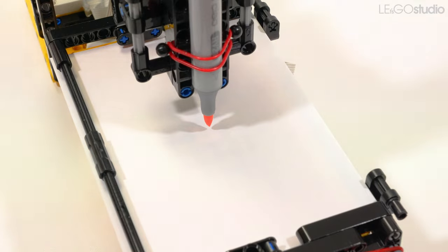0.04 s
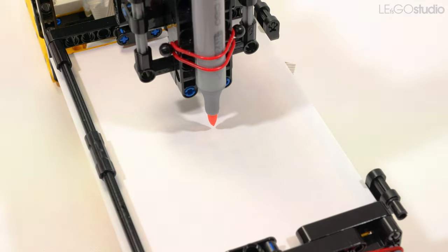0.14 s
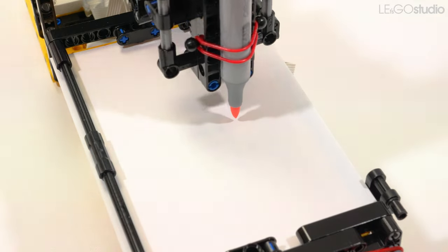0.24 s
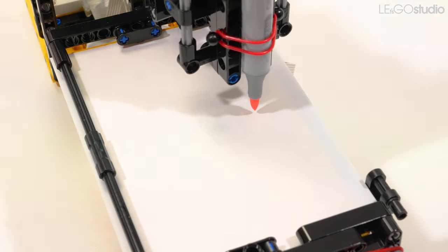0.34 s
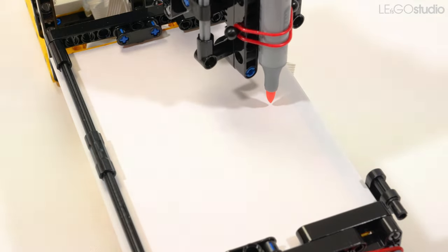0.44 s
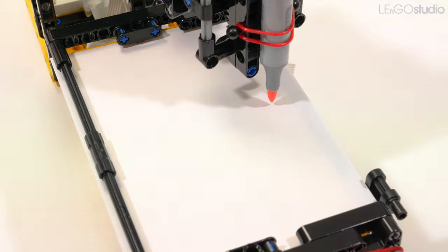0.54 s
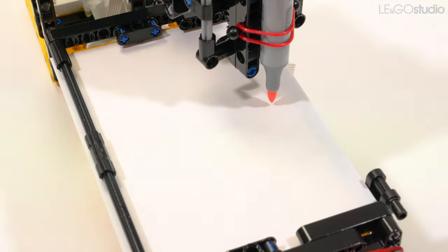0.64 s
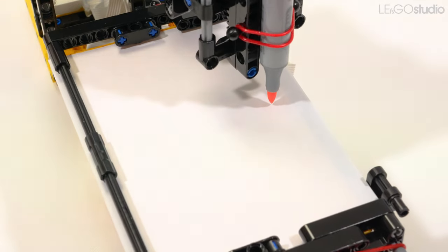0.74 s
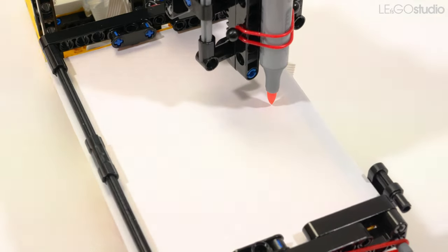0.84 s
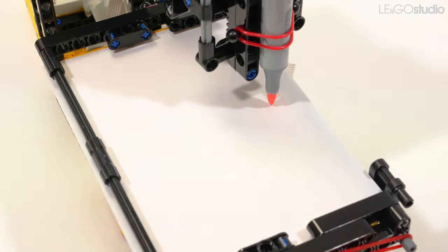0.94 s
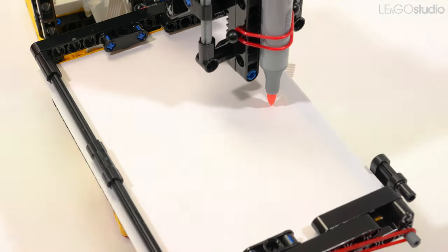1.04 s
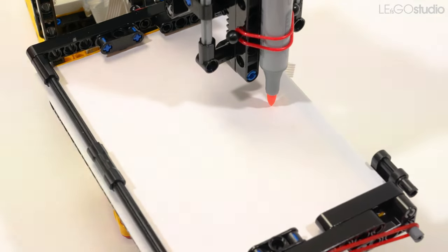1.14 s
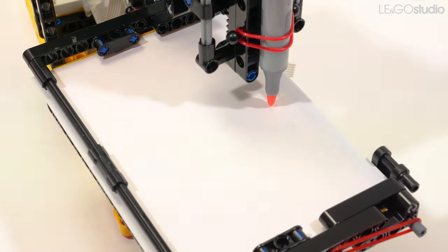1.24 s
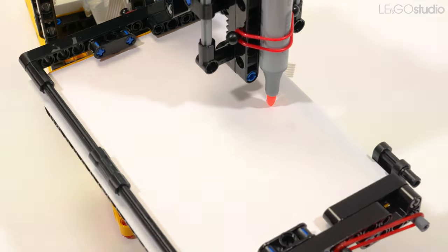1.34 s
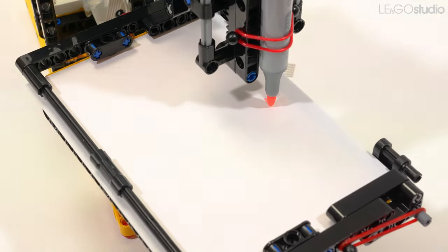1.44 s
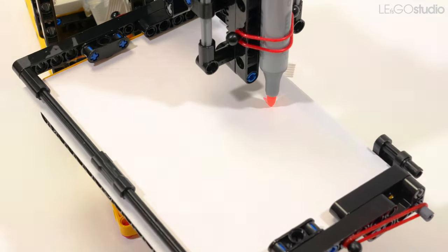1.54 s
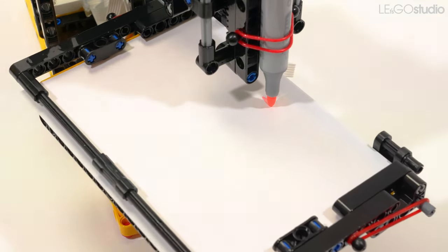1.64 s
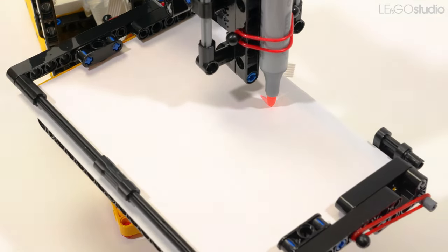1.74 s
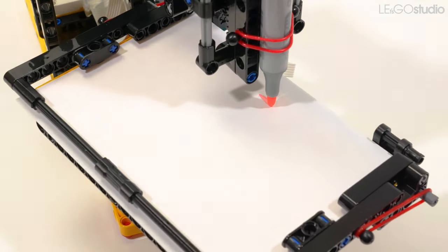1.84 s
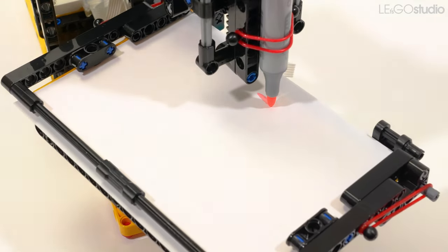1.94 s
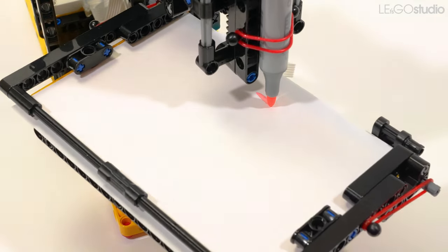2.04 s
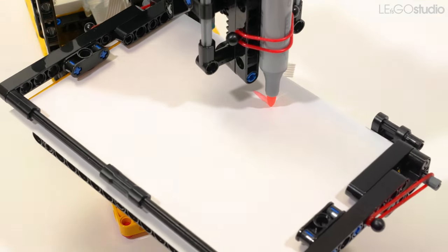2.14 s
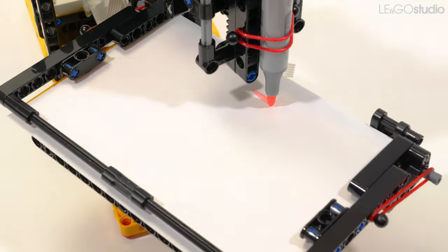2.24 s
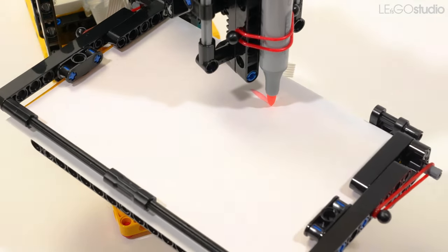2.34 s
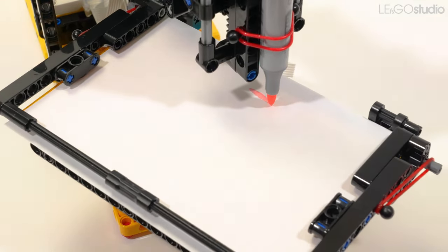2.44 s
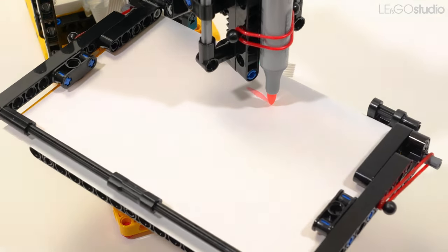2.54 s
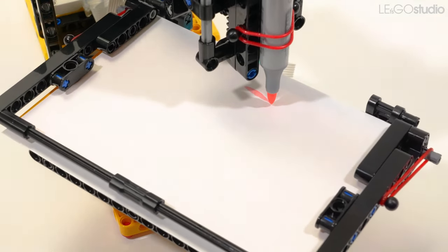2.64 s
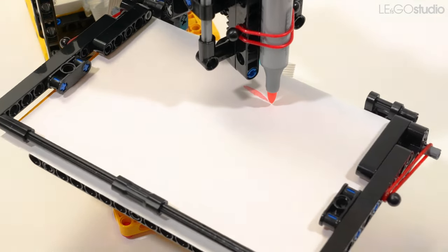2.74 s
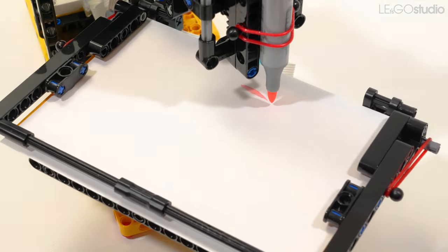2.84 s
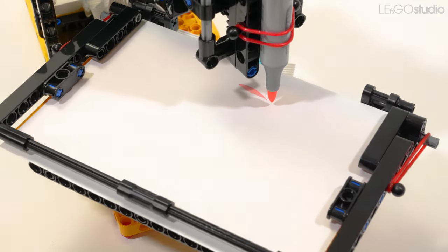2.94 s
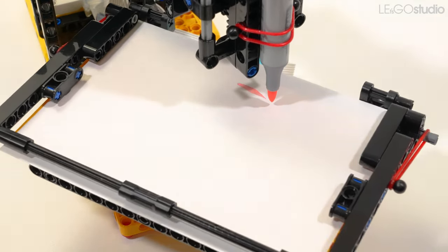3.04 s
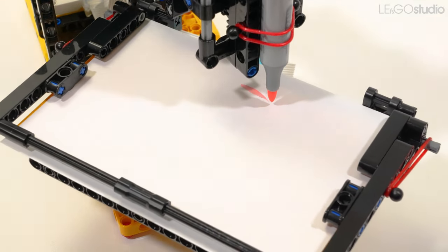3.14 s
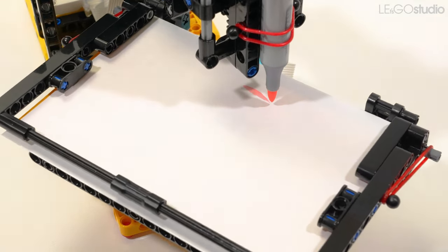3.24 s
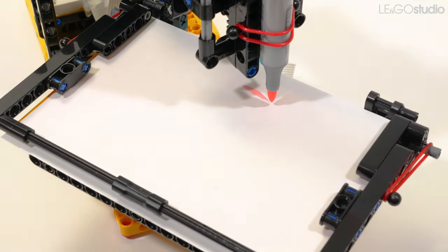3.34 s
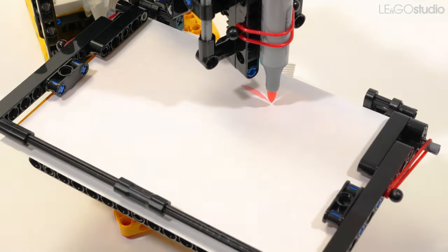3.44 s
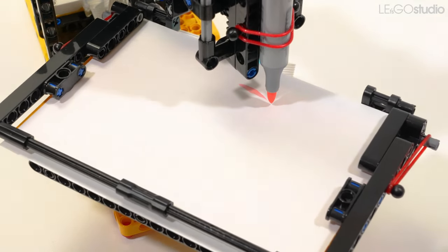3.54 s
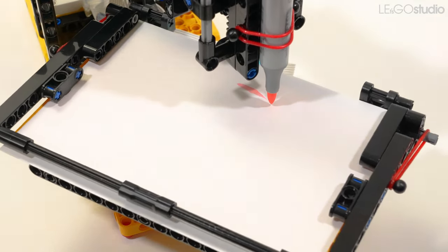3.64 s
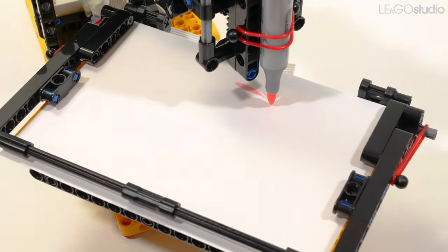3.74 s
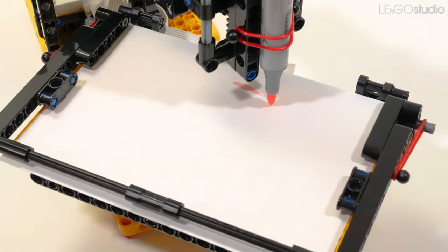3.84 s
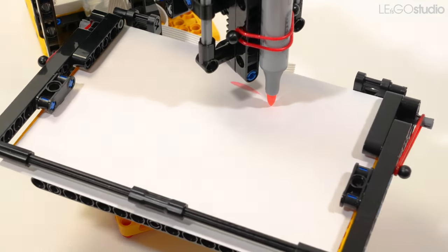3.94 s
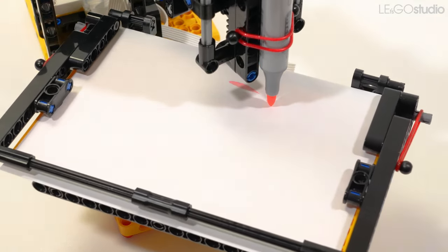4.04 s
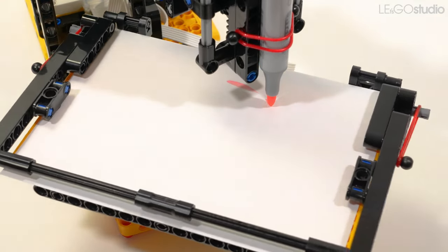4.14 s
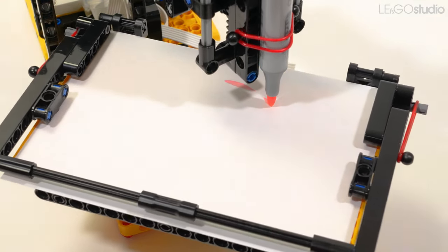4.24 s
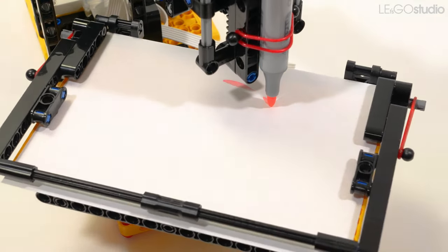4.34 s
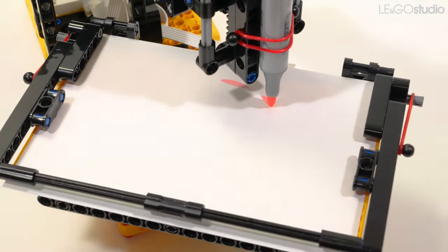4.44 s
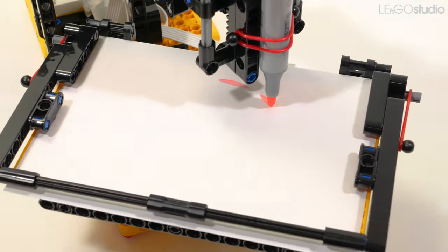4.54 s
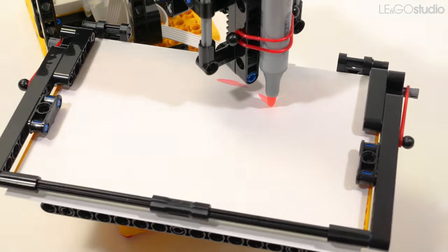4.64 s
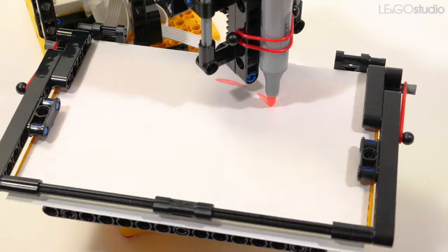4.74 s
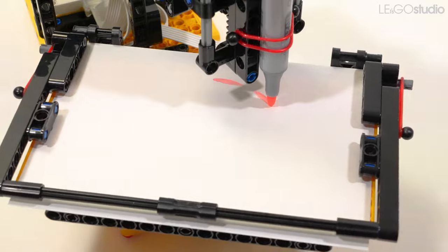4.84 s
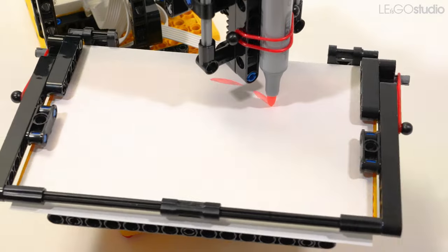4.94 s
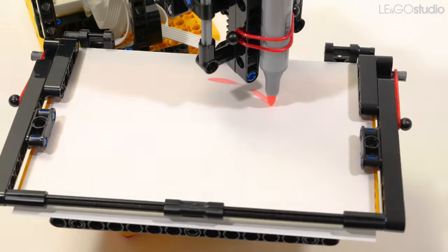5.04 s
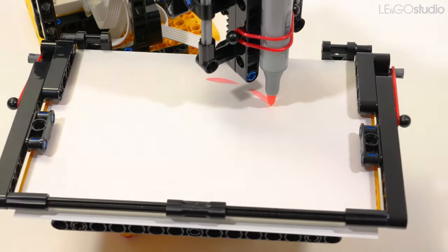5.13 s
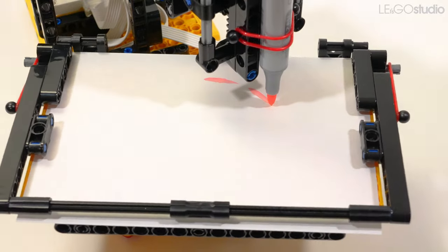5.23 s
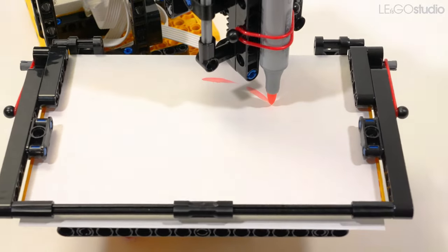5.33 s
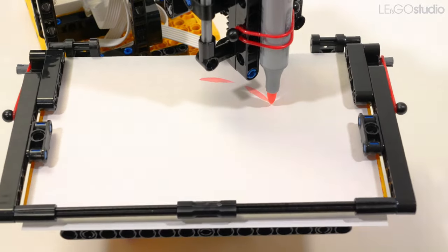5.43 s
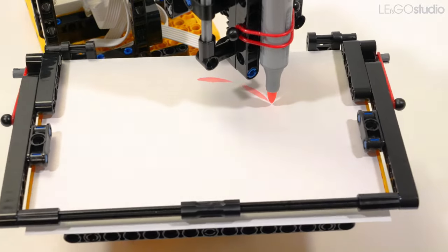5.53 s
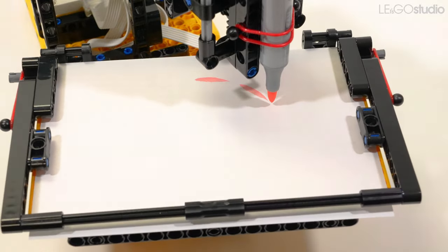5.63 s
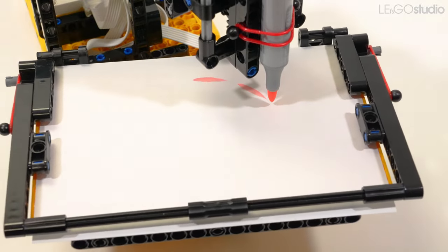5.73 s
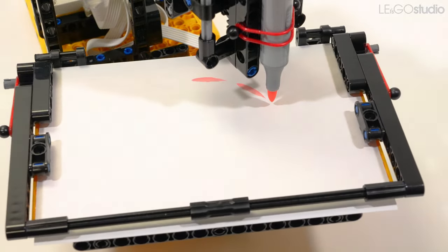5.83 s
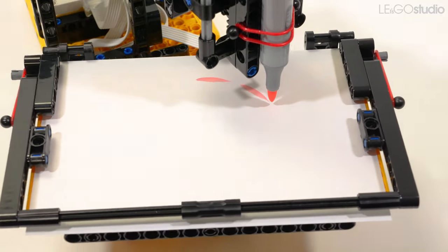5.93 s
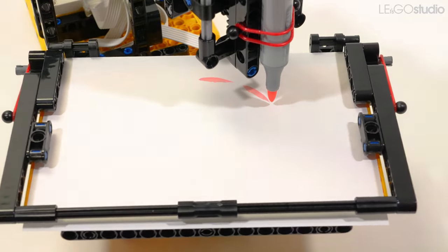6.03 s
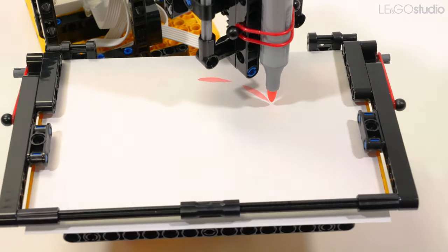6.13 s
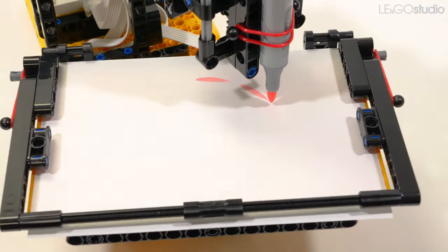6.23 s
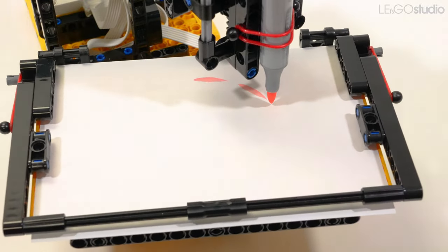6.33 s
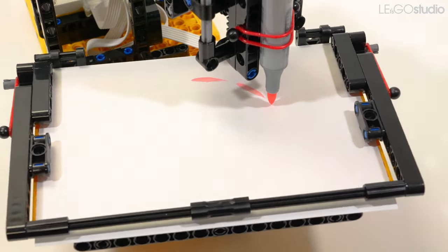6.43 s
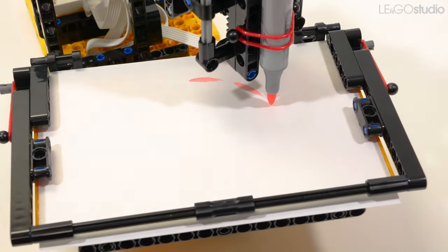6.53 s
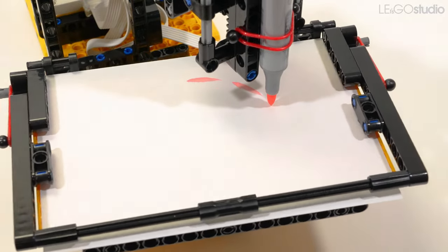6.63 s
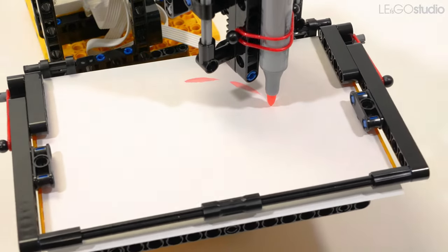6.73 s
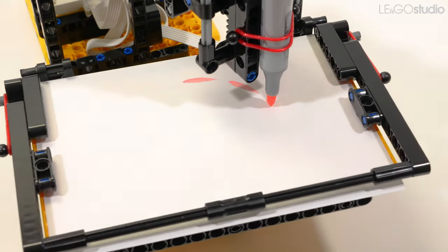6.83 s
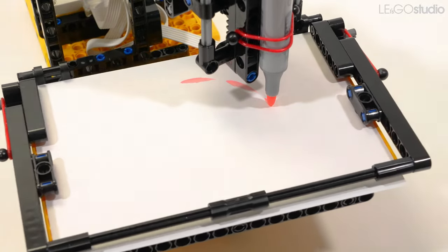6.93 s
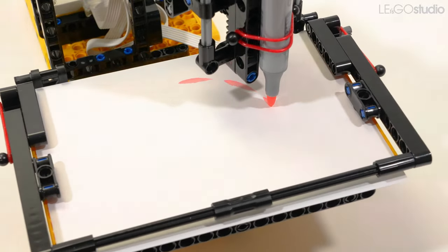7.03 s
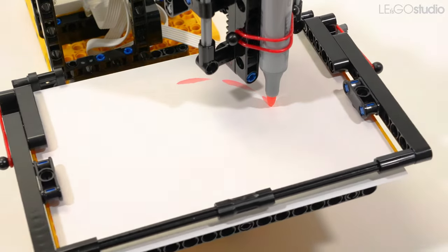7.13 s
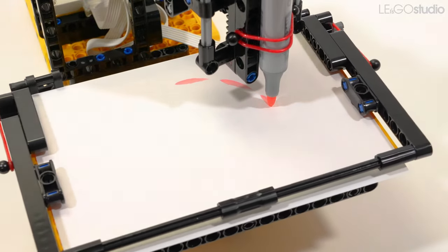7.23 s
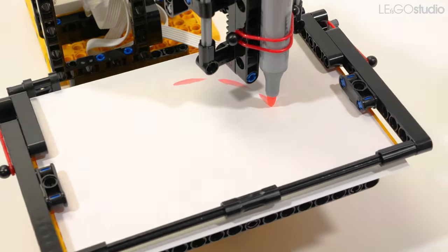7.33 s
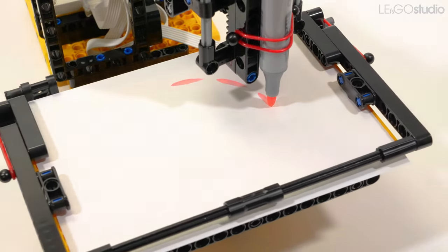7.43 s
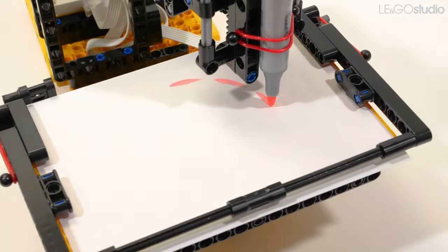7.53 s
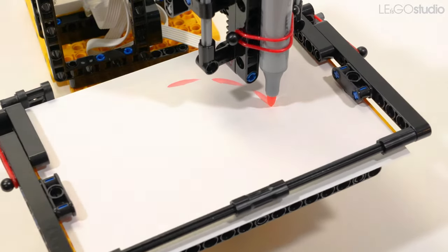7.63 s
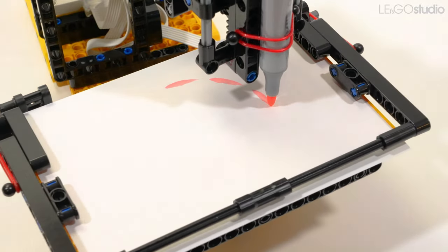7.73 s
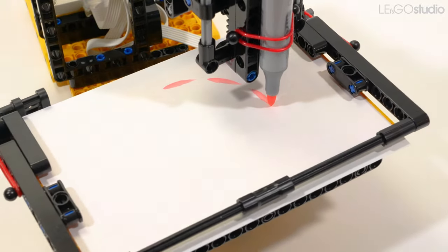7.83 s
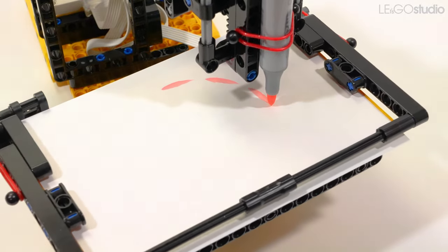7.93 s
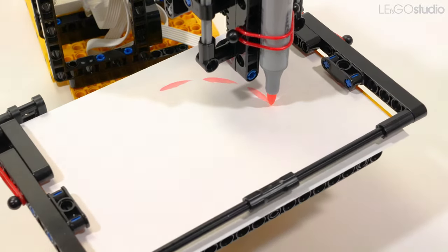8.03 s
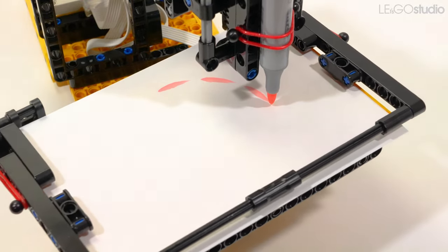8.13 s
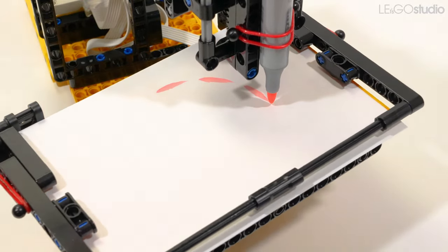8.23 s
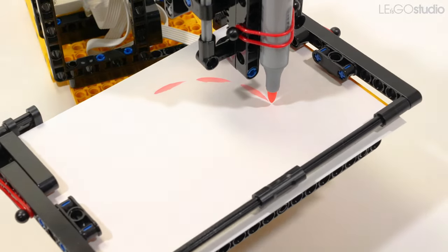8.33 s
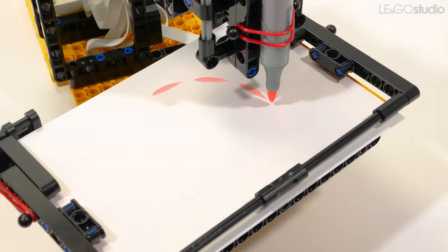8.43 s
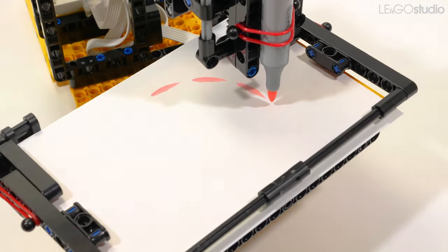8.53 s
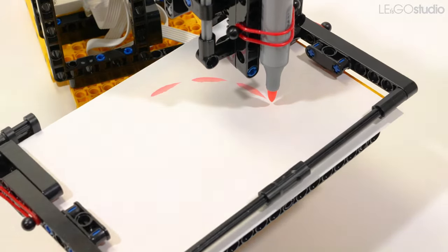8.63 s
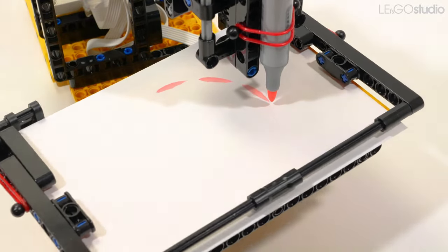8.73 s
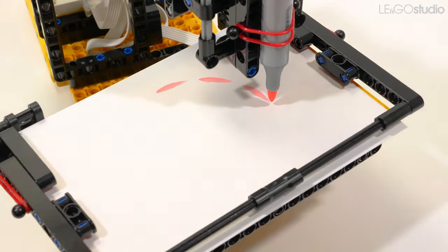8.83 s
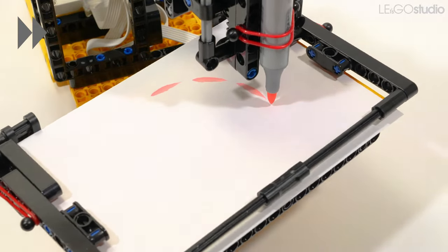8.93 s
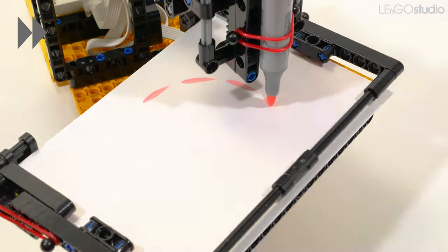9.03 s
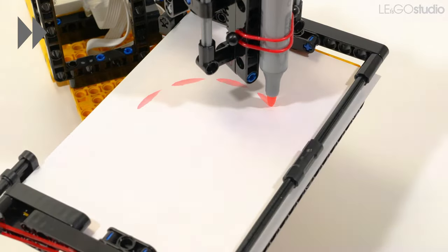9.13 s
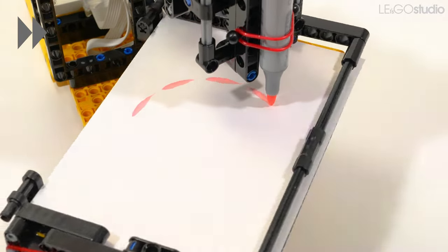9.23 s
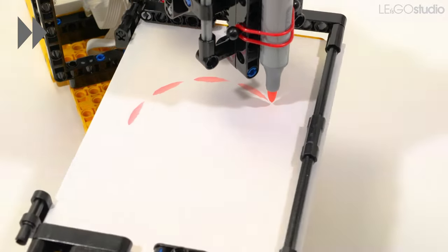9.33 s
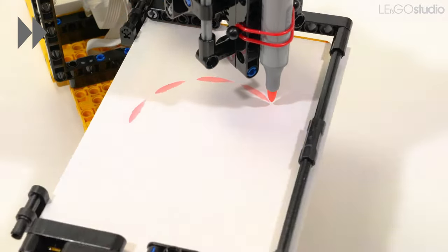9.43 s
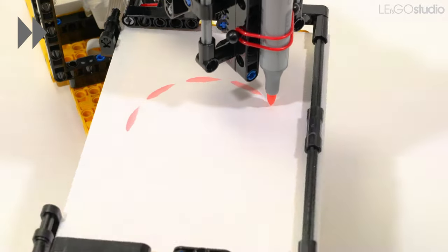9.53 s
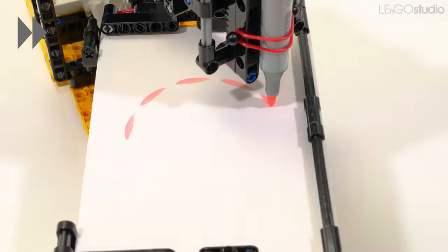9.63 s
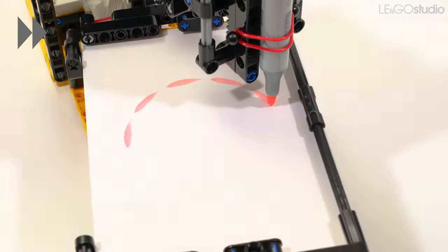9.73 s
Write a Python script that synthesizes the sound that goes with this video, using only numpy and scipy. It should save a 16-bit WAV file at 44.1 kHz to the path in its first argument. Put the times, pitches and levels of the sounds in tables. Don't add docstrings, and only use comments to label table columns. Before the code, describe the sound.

A toy plotter's small geared motor whirs back and forth in even strokes, hissing and whining, with plastic clicks between strokes over faint room ventilation.

```python
import sys
import numpy as np
from scipy import signal
from scipy.fft import rfft, irfft, next_fast_len
from scipy.io import wavfile
from scipy.ndimage import uniform_filter1d, map_coordinates

SR = 44100
rng = np.random.default_rng(int(sys.argv[2]) if len(sys.argv) > 2 else 0)


def level_to_linear(level):
    exponent = np.asarray(level, float) / 20
    return 10 ** exponent


def to_wav(sig):
    pcm = np.clip(np.atleast_2d(sig), -1, 1) * 32767
    pcm = np.round(pcm).astype(np.int16)
    wavfile.write(sys.argv[1], SR, pcm.T)


N = 430857
T = np.arange(N) / SR

# (start [s], length [s], hiss [dB], whine [dB])
OUT_STROKES = [
    (.555, 1.296, -35.5, -2),
    (3.33, 1.295, -35.5, -1),
    (6.085, 1.304, -36, -1),
    (8.85, 1.15, -35.5, -1),
]
BACK_STROKES = [
    (1.86, 1.317, -35.5, -3),
    (4.635, 1.297, -35, -3),
    (7.385, 1.313, -35.5, -2.5),
]
# (frequency [Hz], width [Hz], level [dB])
OUT_BODY = [(1530, 38, -3.5), (1840, 440, -3), (2800, 200, -6), (4070, 220, -5.5), (5030, 90, -11),
            (6050, 40, -9.5), (6460, 56, -5.5), (8100, 150, -2), (8770, 350, -0.5), (8840, 45, -2.5),
            (9260, 180, -6.5), (10370, 80, -4), (11420, 190, -22), (12720, 90, -8), (14700, 70, -2)]
BACK_BODY = [(1486, 52, -4.5), (1800, 220, -9), (2995, 100, -6.5), (4040, 260, -4.5), (5960, 80, -8.5),
             (6660, 150, -7.5), (8190, 120, -5), (8640, 390, 0.5), (8600, 45, 0.5), (8830, 200, 0),
             (10500, 80, -17), (11600, 250, -19.5), (13300, 80, -4.5), (14500, 70, -7)]
CARRIAGE_BODY = [(3750, 400, -14), (5850, 500, -14), (9900, 900, -14)]
# (frequency [Hz], level [dB per Hz])
OUT_COLOUR = [(300, -44), (500, -27.5), (900, -37.5), (1300, -20.5), (1900, -12.5), (2500, -10),
              (3500, -11), (4700, -11.5), (6000, -4.5), (7300, -6.5), (8800, -5), (10500, -7.5),
              (12500, -7.5), (15800, -11)]
BACK_COLOUR = [(300, -46), (500, -26.5), (900, -15.5), (1300, -15), (1900, -5.5), (2500, -10.5),
               (3500, -14), (4700, -9.5), (6000, -3), (7300, -6), (8800, -1.5), (10500, -5), (12500, -6.5),
               (15800, -9)]
CARRIAGE_COLOUR = [(300, -35), (600, -12), (1700, 0), (2500, -5), (3600, -9), (4800, -19), (5900, -10),
                   (7800, -22), (9700, -11), (12600, -24), (14000, -16), (15800, -18)]
NUDGE_COLOUR = [(300, -35), (600, -10.5), (1700, -0.5), (2500, -6.5), (3600, -11.5), (7500, -14.5),
                (9700, -15.5), (13000, -15.5), (15800, -18)]
# (multiple of shaft speed [1], level [dB])
OUT_ORDERS = [(12, -58), (14, -57.5), (16, -62), (17, -48.5), (18, -54), (20, -60), (24, -52), (26, -55),
              (29, -54), (30, -44.5), (32, -49), (34, -59), (36, -63), (37, -64), (41, -65), (44, -60),
              (47, -63)]
BACK_ORDERS = [(14, -50.5), (16, -56), (17, -53), (18, -54.5), (20, -54.5), (22, -64.5), (23, -66.5),
               (24, -52), (26, -52.5), (28, -69.5), (29, -47), (30, -61), (31, -66), (33, -49.5),
               (38, -63.5)]
# (multiple of tooth contact rate [1], level [dB])
MESH_ORDERS = [(2, -65), (3, -58), (4, -54.5), (5, -63.5), (6, -67)]
# (frequency [Hz], level [dB])
PANEL_MODES = [(735, 0), (780, 5), (855, 0), (900, -9), (960, 0), (1040, 0), (1095, -1.5), (1165, 3),
               (1220, 0)]
# (period [s], crest after start [s], speed change [turns/s])
OUT_RIPPLE = [(.29, .51, .55)]
BACK_RIPPLE = [(.356, .615, .5), (.178, .615, .35)]
# (time [s], half width [s], speed change [turns/s])
SURGES = [
    (.86, .09, -1.4),
    (1.14, .06, 3.6),
    (1.56, .06, -1.2),
    (3.65, .07, -.8),
    (5.0, .07, -.8),
    (5.345, .065, 3.6),
    (6.42, .04, -1),
]
# (time [s], half width [s], hiss change [dB])
BRUSH_LOAD = [
    (1.25, 0.15, 1.1),
    (3.68, .08, -1.5),
    (4.29, .07, -0.2),
    (4.88, .05, 0.6),
    (5.1, .1, -.8),
    (6.4, 0.053, -1),
    (7.72, 0.033, -0.5),
]
# (start [s], powered time [s], hiss [dB], growl [dB])
CARRIAGE_RUNS = [
    (.13, 0.36, -53.5, -55),
    (3.125, 0.074, -51, -44.5),
    (5.905, .07, -51, -42.5),
    (8.655, 0.094, -51, -44.5),
]
# (time [s], peak [dB], ring [Hz], treble over peak [dB])
CLICKS = [(0.1558, -39, 1830, -6), (0.4936, -43, 2300, -16), (3.095, -36, 1620, -17),
          (3.1650, -27, 2350, -18), (3.2087, -33, 1600, -16), (3.2535, -33.5, 2160, -25),
          (3.4304, -36.5, 1770, -12), (5.932, -29, 2440, -19), (5.951, -31, 2230, -15),
          (5.996, -40, 1840, -16), (6.0285, -35, 1870, -27), (6.11, -38, 1730, -12),
          (8.6202, -39, 1570, -13), (8.696, -27, 2180, -20), (8.7362, -34, 1800, -18),
          (8.7575, -32.5, 2105, -18.5), (8.7797, -29.5, 2460, -22.5), (8.877, -39.5, 1674, -11)]
# (time [s], peak [dB], ring [Hz], treble over peak [dB])
STOP_HITS = [
    (5.8574, -26.5, 1750, -24),
    (5.8622, -31, 1600, -24),
]
# (time [s], half width [s], rms level [dB])
THUMPS = [
    (.225, .03, -46),
    (8.725, 0.023, -48.5),
]
# (time [s], half width [s], extra level [dB])
JOLTS = [
    (.42, .04, 6),
    (1.17, 0.11, 6.5),
    (3.22, 0.087, 5),
    (3.93, 0.047, 5.5),
    (6.0, 0.044, 5.5),
    (8.72, .04, 8.5),
]
# (frequency [Hz], time to fall 60 dB [s])
ECHO = [(500, 0.18), (2000, 0.35), (10000, 0.062)]
# (frequency [Hz], level [dB per Hz])
RUMBLE_COLOUR = [(15, -31), (25, -12), (45, -5.5), (56, -6.5), (66, 3.5), (79, -11.5), (100, -4.5),
                 (125, -4.5), (200, -16.5), (300, -8), (500, -15), (800, -33)]
ROOM_COLOUR = [(120, -29), (200, -8), (763, -6), (899, -5), (968, -5.5), (1620, -6), (2290, -7),
               (2510, -12.5), (4350, -27.5), (4600, -20), (6880, -30), (10300, -34), (16000, -23)]
# (frequency [Hz], left-right likeness [0-1])
ALIKE = [(15, .999), (30, 0.97), (60, 1), (130, 0.99), (290, 0.88), (640, 0.68), (1400, 0.76), (3100, .57),
         (6800, 0.64), (14000, 0.49), (15800, .3)]
# (frequency [Hz], left minus right [dB])
LEAN = [(100, -0.5), (380, 0.9), (1290, -1.5), (3500, 0), (6000, -3), (10000, -3.5), (15000, 1.5)]
# (frequency [Hz], left lead [rad])
LEAD = [(2300, .15), (5000, -0.74), (8500, .4), (11000, 0.61), (14600, 1.1)]


def stroke(rows, body, colour, orders, ripple, growl_db, mesh_db, strained=1):
    hiss_power, growl_power, whine_power = 1.44, 0.75, 3.8
    hiss = growl = sing = 0
    for start, length, level_db, whine_db in rows:
        speed = pace(start, length)
        hiss = hiss + level_to_linear(level_db) * np.minimum(1.11 * speed, 1) ** hiss_power
        strain = bumps([(start + .19, 0.077, 4.5), (start + length - 0.23, 0.077, 2.1)])
        growl = growl + level_to_linear(level_db + growl_db + strained * strain) * speed ** growl_power
        sing = sing + level_to_linear(whine_db) * pace(start, length - .06) ** whine_power
    noise = geared(level_to_linear(bumps(BRUSH_LOAD)) * hiss, growl, body, colour, patchy_db=0.65, grain_db=1.0)
    return noise + whine(shaft(rows, ripple), sing, orders, mesh_db)


def geared(hiss_gain, growl_gain, body, colour, patchy_db, grain_db):
    panel_knots = rng.standard_normal(SR // 90)

    def housing(hz):
        power = level_to_linear(2 * along(colour, hz))
        for centre, width, db in body:
            power = power + level_to_linear(2 * db) / (1 + (2 * (hz - centre) / width) ** 2)
        return np.sqrt(power) * level_to_linear(1.8 * map_coordinates(panel_knots, [hz / 45]))

    noise = rush(housing, patchy_db, grain_db)
    growl = filtered(noise, lambda hz: 1 / (1 + (hz / 3500) ** 8))
    flutter_db = .7 * wobble(7) + .6 * wobble(25)
    hiss = hiss_gain * level_to_linear(2.5 + flutter_db) * unit(noise - growl)
    return hiss + growl_gain * level_to_linear(0.66 * wobble(12)) * unit(growl)


def whine(speed, sing, orders, mesh_db):
    mesh = 16.74
    turns = np.cumsum(speed + .15 * wobble(8) + .08 * wobble(40)) / SR
    slip = np.cumsum(.5 * wobble(45)) / SR
    on = np.flatnonzero(sing)
    lines = [(k * turns, db + along(PANEL_MODES, k * speed[on])) for k, db in orders]
    lines += [(k * mesh * (turns + slip), db + mesh_db) for k, db in MESH_ORDERS]
    out = np.zeros((2, N))
    for cycles, db in lines:
        swell_db = (1.3 * wobble(9) + 1.8 * wobble(25))[on]
        skew = rng.normal(0, 0.44) + .4 * wobble(6.6)[on]
        phase = 2 * np.pi * (cycles[on] + rng.random()) + np.outer([.5, -.5], skew)
        out[:, on] += level_to_linear(db + swell_db) * np.sin(phase)
    return sing * out


def shaft(rows, ripple):
    full_speed, speed_power = 60.9, .4
    speed = bumps(SURGES)
    for start, length, *_ in rows:
        rock = 0
        for period, crest, size in ripple:
            rock = rock + size * np.cos(2 * np.pi * (T - start - crest) / period)
        drive = np.minimum(1.22 * pace(start, length), 1)
        speed = speed + drive ** speed_power * (full_speed + rock)
    return speed


def pace(start, length):
    spin_up_s, spin_down_s = .31, .3
    return np.clip(np.minimum((T - start) / spin_up_s, (start + length - T) / spin_down_s), 0, 1)


def carriage(rows, body, colour):
    kick_s, coast_db_per_s = 0.031, 120.5

    def run(start, powered, rise_db):
        rise = -rise_db * np.clip(1 - (T - start) / kick_s, 0, 1)
        coast = -coast_db_per_s * np.maximum(T - start - powered, 0)
        return (T >= start) * level_to_linear(rise + coast)

    hiss = sum(level_to_linear(db) * run(start, powered, 13.5) for start, powered, db, _ in rows)
    growl = sum(level_to_linear(db) * run(start, powered, 6.5) for start, powered, _, db in rows)
    return geared(hiss, growl, body, colour, patchy_db=0.5, grain_db=2.0)


def clicks():
    stop_t60 = 0.016
    out = np.zeros(N)
    hits = [(*row, max(.055 + 0.01 * (row[1] + 33), stop_t60)) for row in CLICKS]
    hits += [(*row, stop_t60) for row in STOP_HITS]
    for start, db, hz, treble_db, t60 in hits:
        sound = level_to_linear(db) * knock(hz, treble_db, t60)
        out[round(start * SR):][:len(sound)] += sound
    return out


def knock(hz, treble_db, t60):
    t = np.arange(SR // 8) / SR
    rattle = rng.standard_normal(len(t)) * level_to_linear(-60 * t / t60)
    rattle[0] = 6.5
    upper = .7 * np.clip((hz - 1550) / (2300 - 1550), .1, 1)
    panel = level_to_linear(-60 * t / .0045) * np.sin(2 * np.pi * hz * t)
    panel += upper * level_to_linear(-60 * t / .002) * np.sin(2 * np.pi * 3500 * t)
    no_bass = signal.butter(3, 1050, 'hp', fs=SR, output='sos')
    ring = signal.sosfilt(no_bass, signal.fftconvolve(rattle, panel)[:len(t)])
    crack = level_to_linear(treble_db - 3.5 - 60 * t / t60) * np.diff(rng.standard_normal(len(t) + 1))
    thud = level_to_linear(-26.5 - 60 * t / .08) * np.sin(2 * np.pi * 160 * t) * (1 - np.exp(-t / .006))
    return level_to_linear(2.5) * ring / abs(ring).max() + crack + thud


def thumps():
    push = bumps([(time, width, level_to_linear(db + 3)) for time, width, db in THUMPS])
    return push * np.sin(2 * np.pi * 149 * T)


def echo(x):
    hz, t, z = signal.stft(rng.standard_normal((2, SR // 3)), SR, nperseg=256)
    fade = level_to_linear(-60 * t / along(ECHO, hz)[:, None])
    tail = signal.istft(z * fade, SR, nperseg=256)[1]
    return signal.fftconvolve(x[None], tail / np.linalg.norm(tail[0]), axes=1)[:, :N]


def room():
    rumble = rush(lambda hz: level_to_linear(along(RUMBLE_COLOUR, hz)), patchy_db=1.2)
    throb = rush(lambda hz: 1 / (1 + (2 * (hz - 155) / 70) ** 2), patchy_db=-0.7)
    hiss = rush(lambda hz: level_to_linear(along(ROOM_COLOUR, hz)), patchy_db=1.56)
    throb_db = -58.5 + 2.5 * wobble(9) + bumps(JOLTS)
    return level_to_linear(-52.0) * rumble + level_to_linear(throb_db) * throb + level_to_linear(-50) * hiss


def rush(gain, patchy_db, grain_db=0.):
    contacts = rng.standard_normal((2, N)) * level_to_linear(grain_db * wobble(900))
    z = signal.stft(contacts, nperseg=512)[2]
    field = uniform_filter1d(rng.standard_normal(z.shape[1:]), size=5, axis=0)
    field = uniform_filter1d(field, size=10, axis=1)
    pair = signal.istft(z * level_to_linear(patchy_db * unit(field)), nperseg=512)[1][:, :N]

    def mid_side(hz):
        angle = np.arccos(np.clip(along(ALIKE, hz), 0, 1)) / 2
        return gain(hz) * np.array([np.cos(angle), np.sin(angle)])

    mid, side = filtered(pair, mid_side)
    return unit(np.array([mid + side, mid - side]))


def filtered(x, response):
    m = next_fast_len(N + 8192)
    return irfft(rfft(x, m) * response(np.fft.rfftfreq(m, 1 / SR)), m)[..., :N]


def bumps(rows):
    return sum(size * np.exp(-.5 * ((T - time) / width) ** 2) for time, width, size in rows)


def wobble(rate):
    return map_coordinates(rng.standard_normal(int(N * rate / SR) + 4), [T * rate])


def along(points, hz):
    f, v = np.transpose(points)
    return np.interp(np.log(hz + 1), np.log(f + 1), v)


def unit(x):
    return x / np.sqrt(np.mean(x ** 2) + 1e-20)


def scene():
    out = stroke(OUT_STROKES, OUT_BODY, OUT_COLOUR, OUT_ORDERS, OUT_RIPPLE, growl_db=-7.5, mesh_db=6.0)
    back = stroke(BACK_STROKES, BACK_BODY, BACK_COLOUR, BACK_ORDERS, BACK_RIPPLE,
                  growl_db=-6.5, mesh_db=2.0, strained=0.28)
    long_run = carriage(CARRIAGE_RUNS[:1], CARRIAGE_BODY, CARRIAGE_COLOUR)
    nudges = carriage(CARRIAGE_RUNS[1:], [], NUDGE_COLOUR)
    knocks = clicks()
    machine = out + back + long_run + nudges + knocks
    return machine + level_to_linear(-5.5) * echo(knocks) + thumps() + room()


def roll_off(x):
    return signal.sosfilt(signal.butter(12, 16640, fs=SR, output="sos"), x)


def record(dry):
    top_hz, cut_s = 15800, 8.9342

    def ports(hz):
        balance = np.log(level_to_linear(along(LEAN, hz)))
        lead = along([(20, 0)] + LEAD, hz)
        return np.exp(np.outer([.5, -.5], balance + 1j * lead)) * (hz < top_hz)

    mix = filtered(dry, ports) * np.clip((cut_s - T) / .0012, 0, 1)
    return roll_off(mix)


dry = scene()
out = record(dry)
to_wav(out)
```